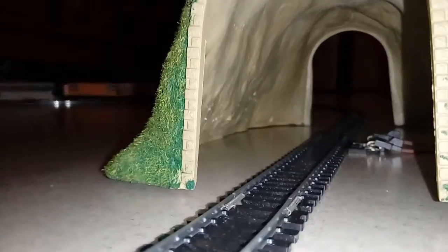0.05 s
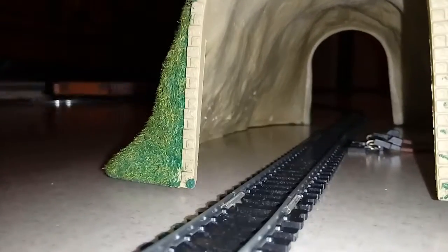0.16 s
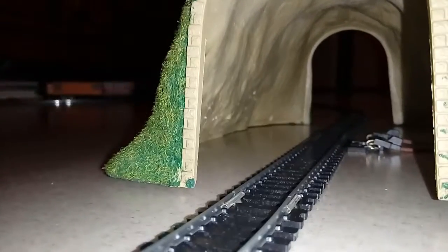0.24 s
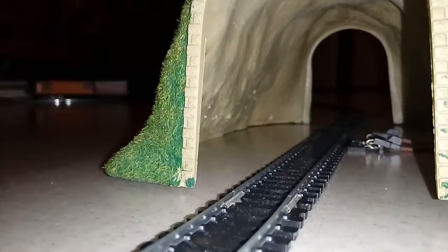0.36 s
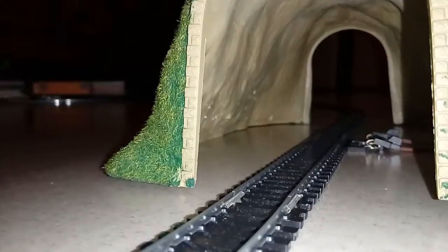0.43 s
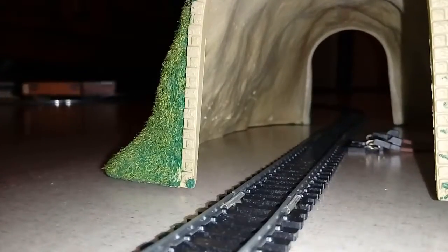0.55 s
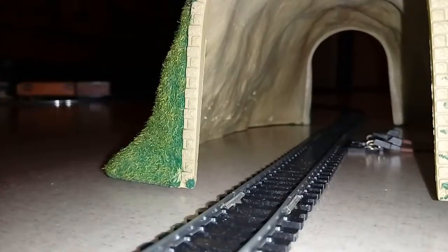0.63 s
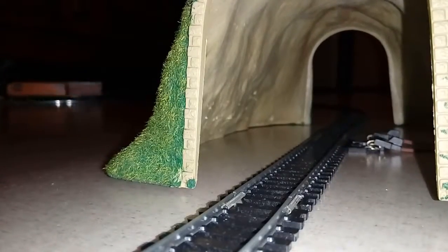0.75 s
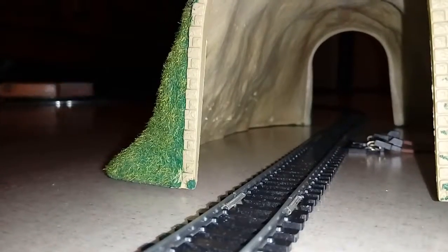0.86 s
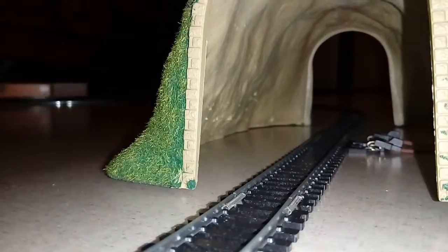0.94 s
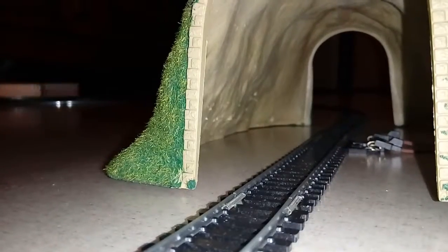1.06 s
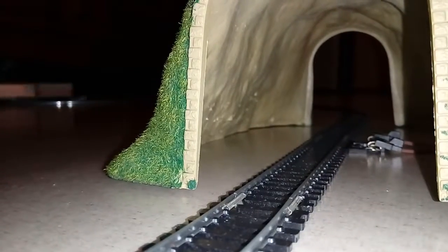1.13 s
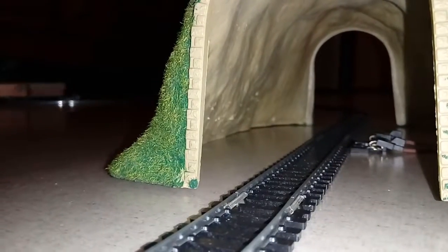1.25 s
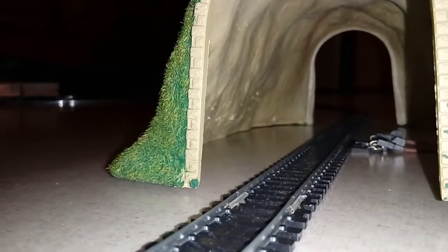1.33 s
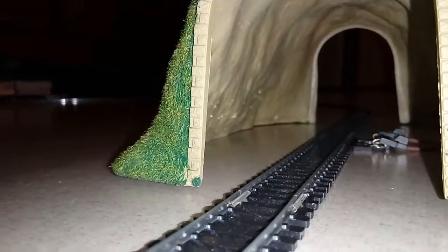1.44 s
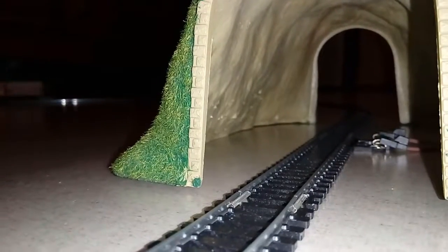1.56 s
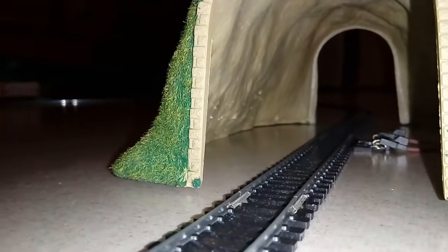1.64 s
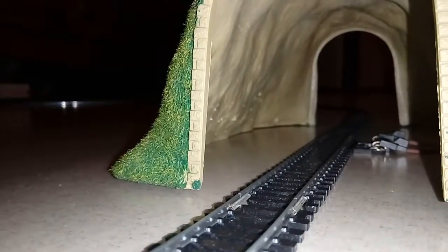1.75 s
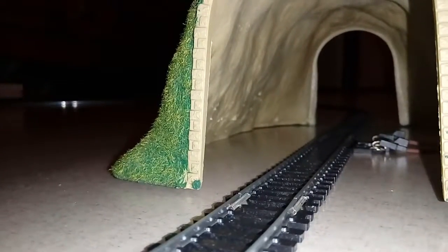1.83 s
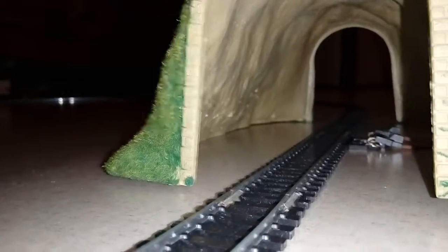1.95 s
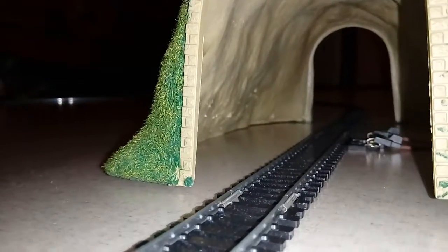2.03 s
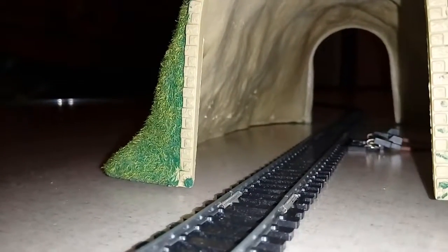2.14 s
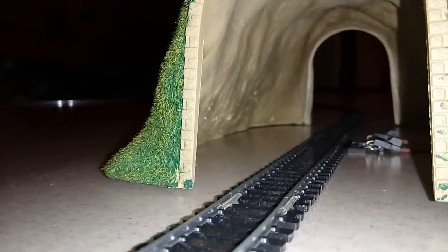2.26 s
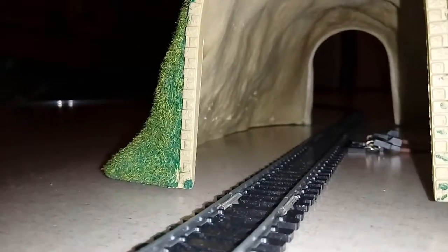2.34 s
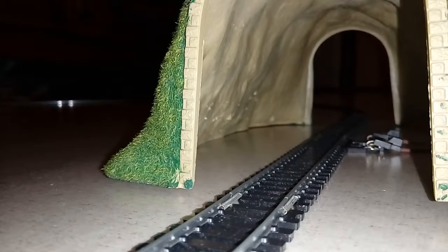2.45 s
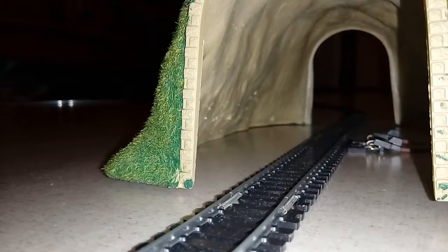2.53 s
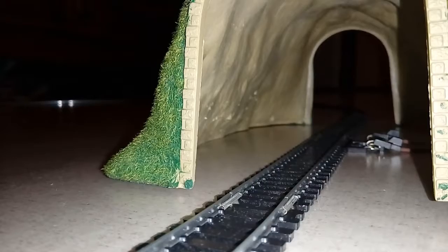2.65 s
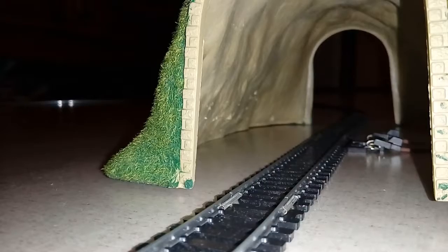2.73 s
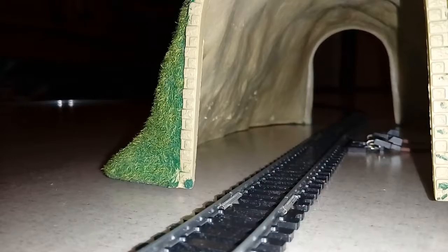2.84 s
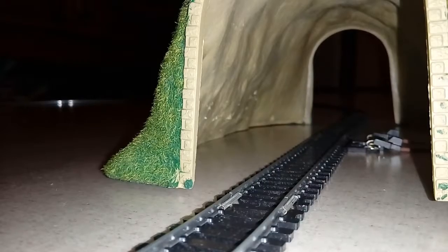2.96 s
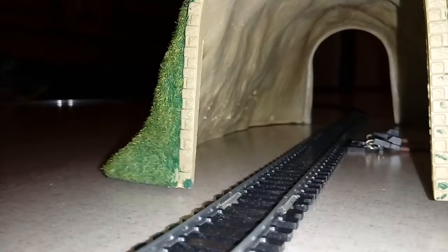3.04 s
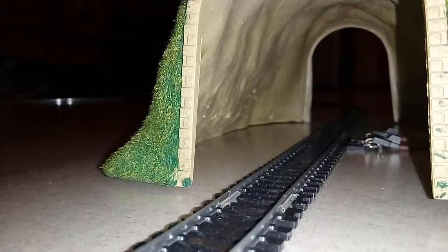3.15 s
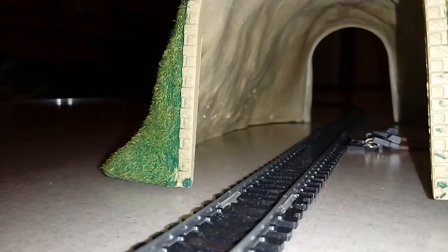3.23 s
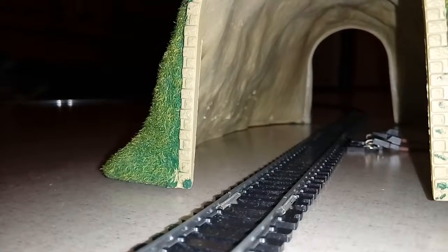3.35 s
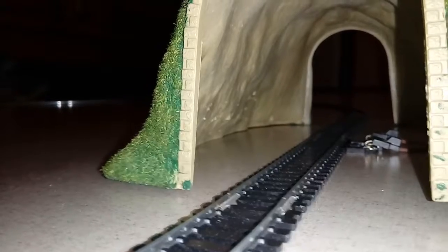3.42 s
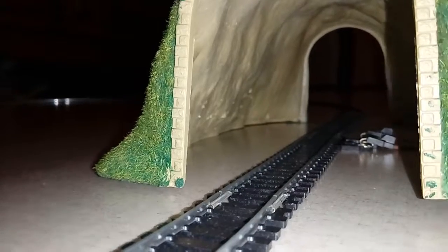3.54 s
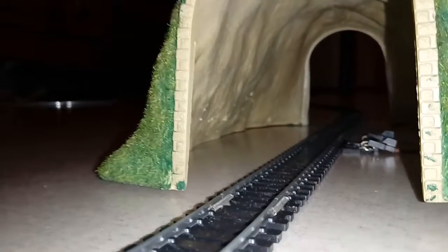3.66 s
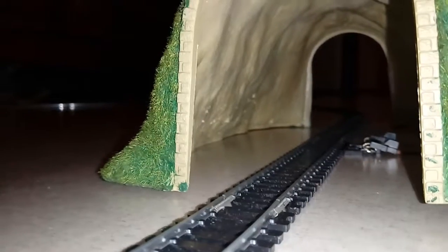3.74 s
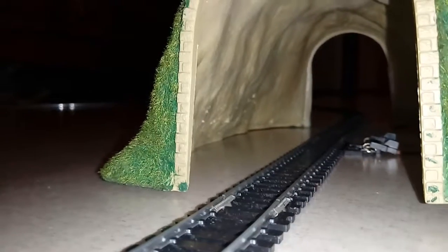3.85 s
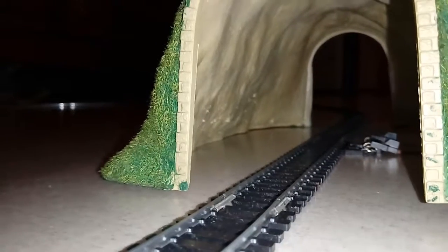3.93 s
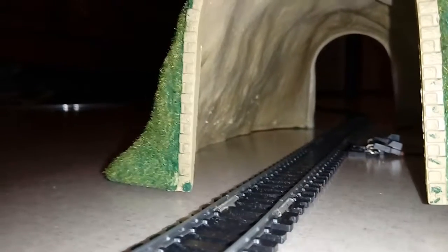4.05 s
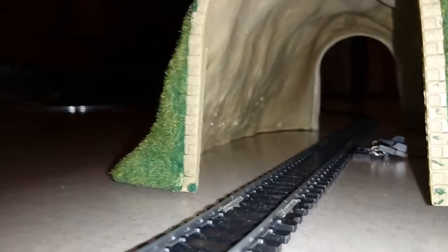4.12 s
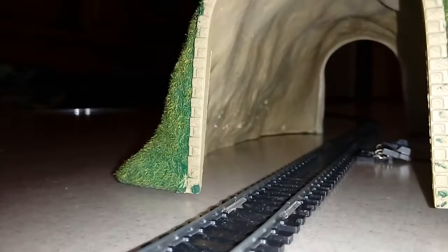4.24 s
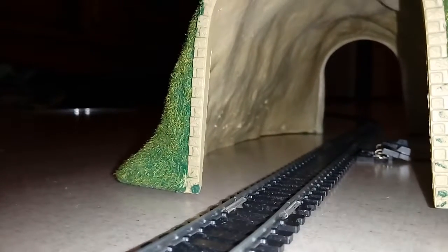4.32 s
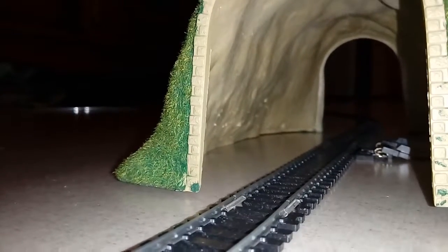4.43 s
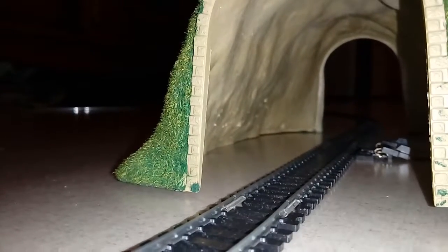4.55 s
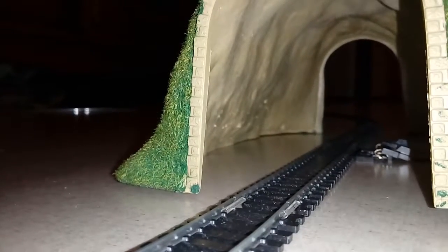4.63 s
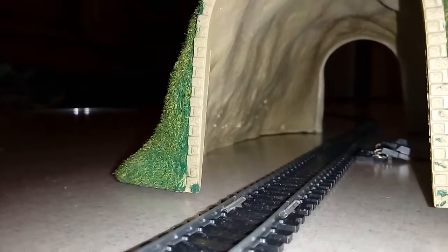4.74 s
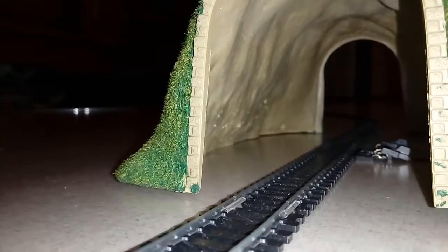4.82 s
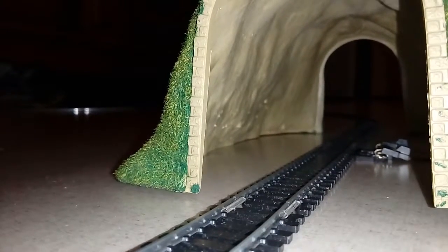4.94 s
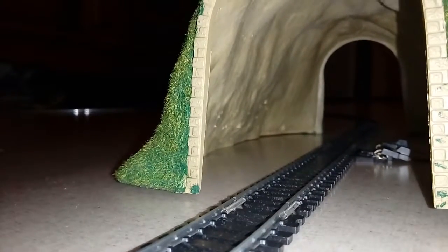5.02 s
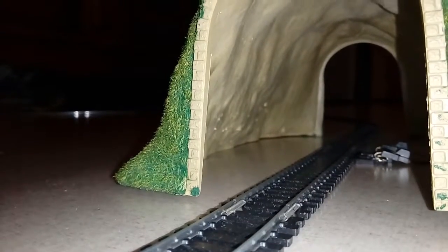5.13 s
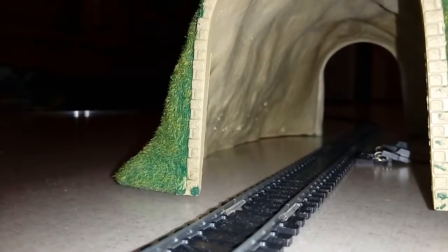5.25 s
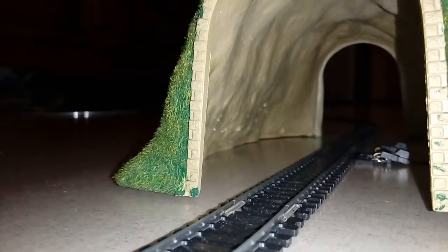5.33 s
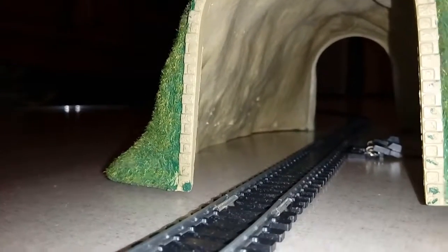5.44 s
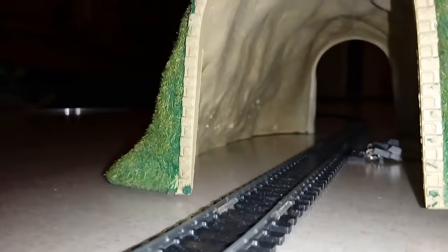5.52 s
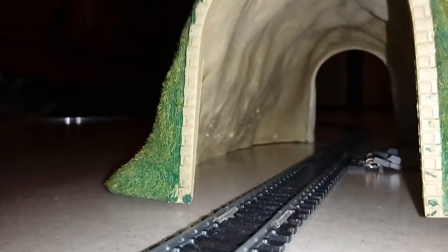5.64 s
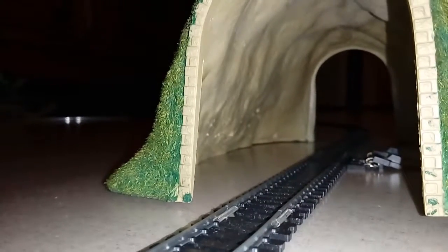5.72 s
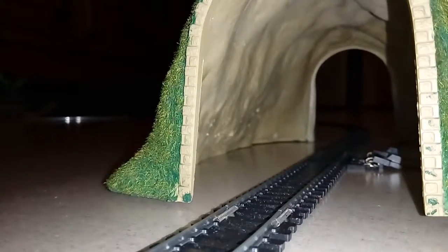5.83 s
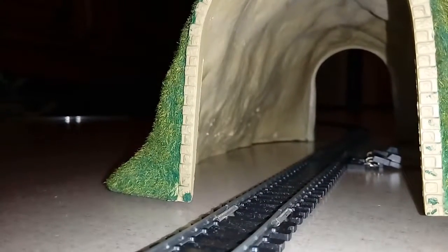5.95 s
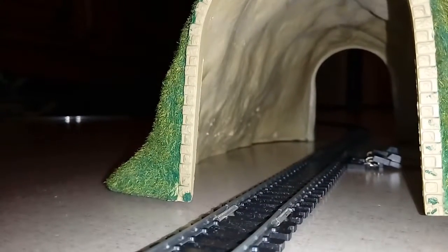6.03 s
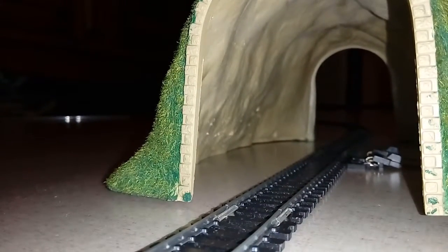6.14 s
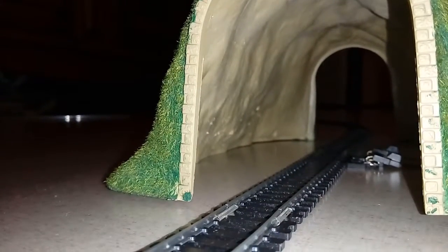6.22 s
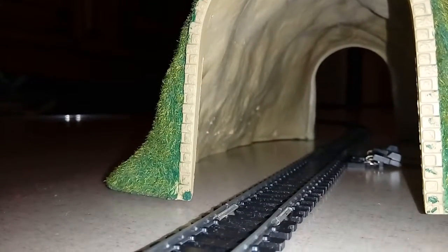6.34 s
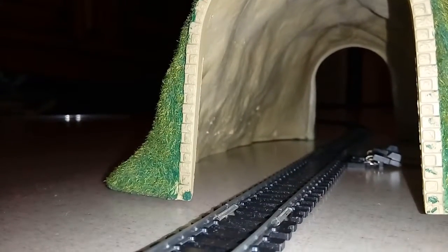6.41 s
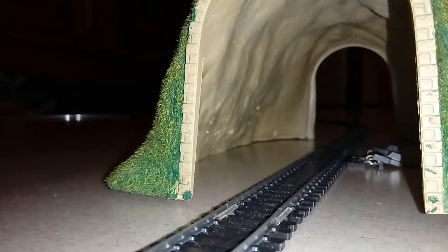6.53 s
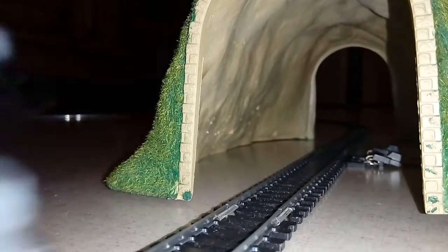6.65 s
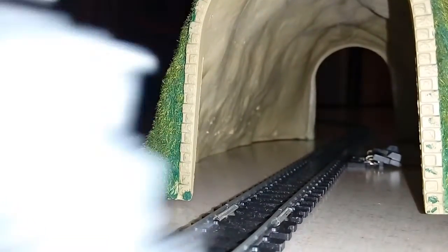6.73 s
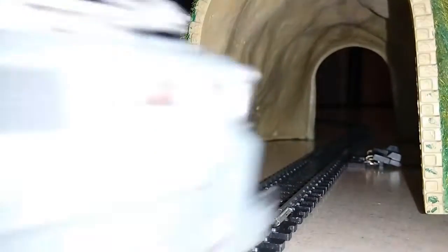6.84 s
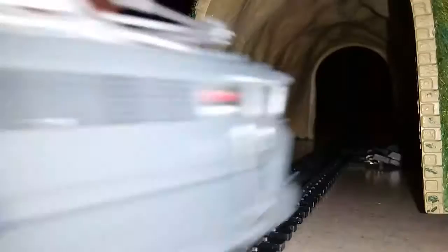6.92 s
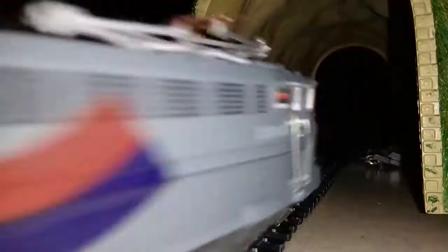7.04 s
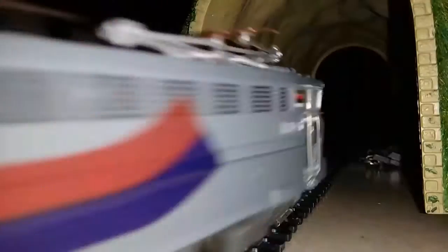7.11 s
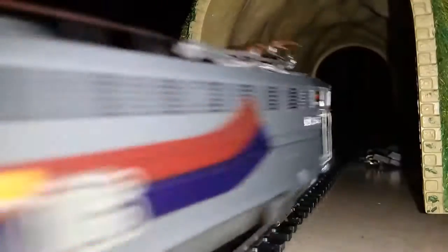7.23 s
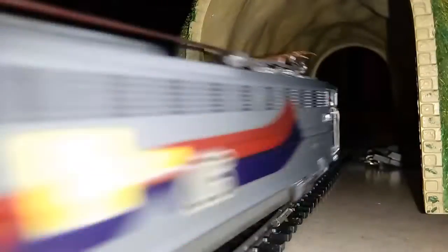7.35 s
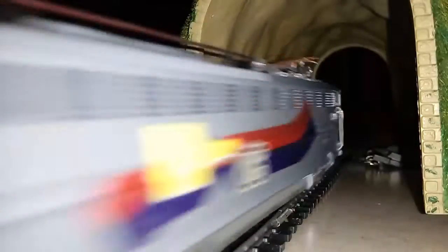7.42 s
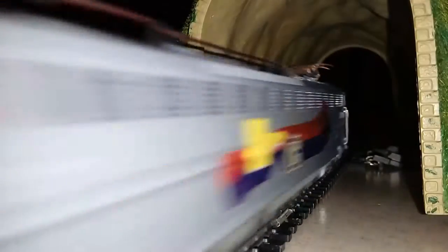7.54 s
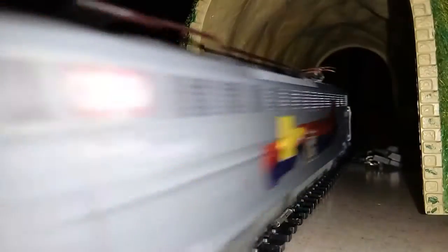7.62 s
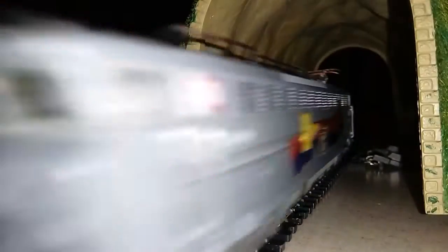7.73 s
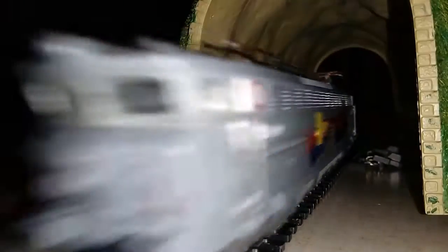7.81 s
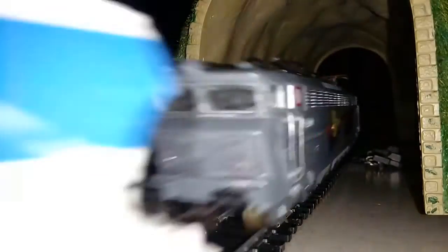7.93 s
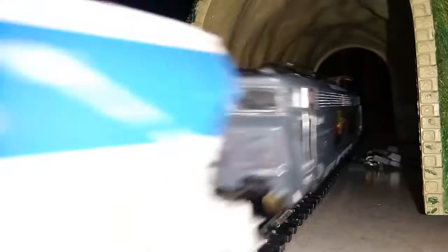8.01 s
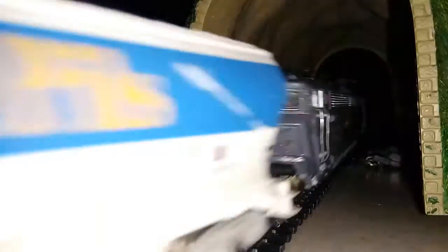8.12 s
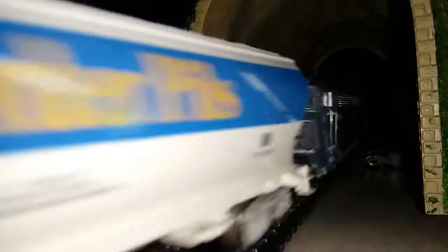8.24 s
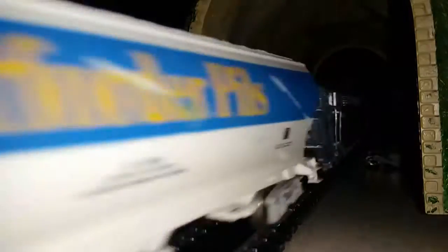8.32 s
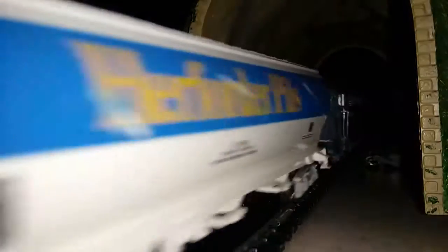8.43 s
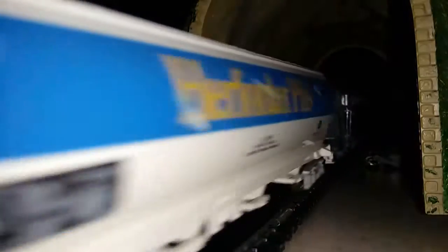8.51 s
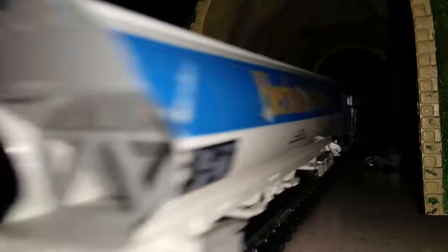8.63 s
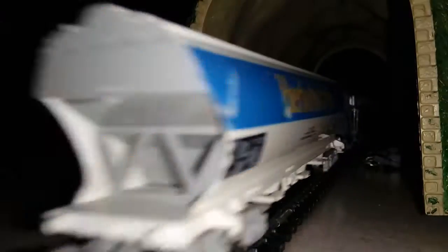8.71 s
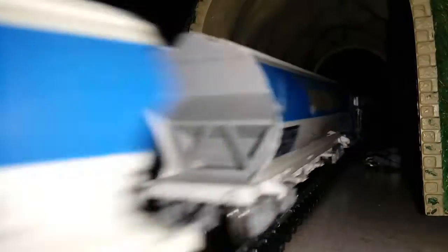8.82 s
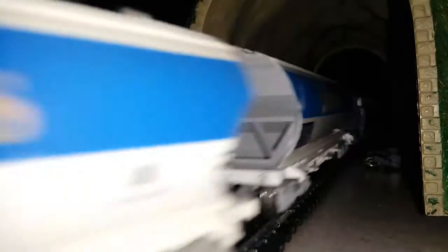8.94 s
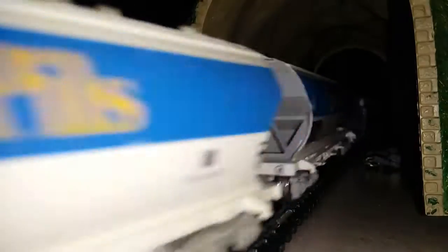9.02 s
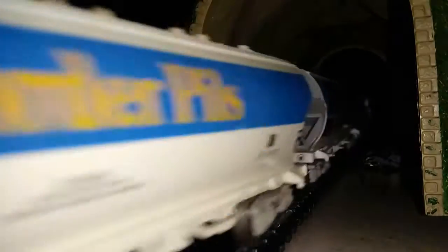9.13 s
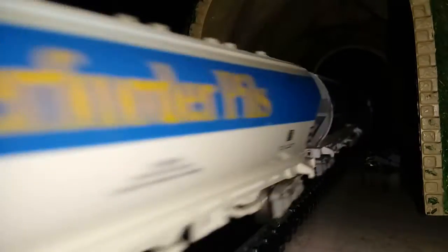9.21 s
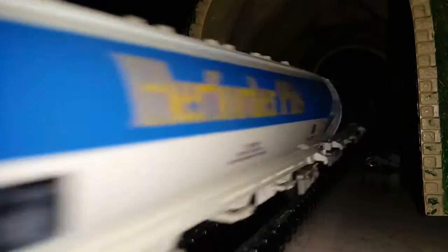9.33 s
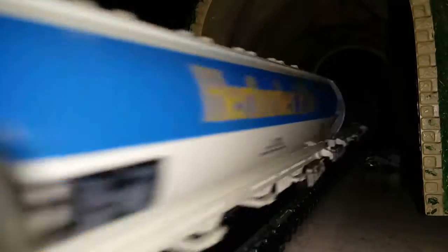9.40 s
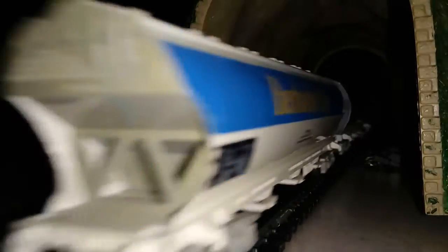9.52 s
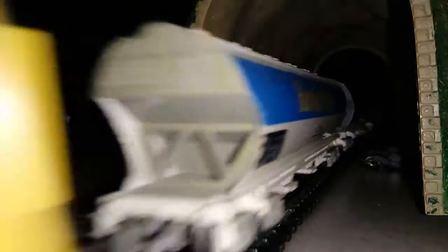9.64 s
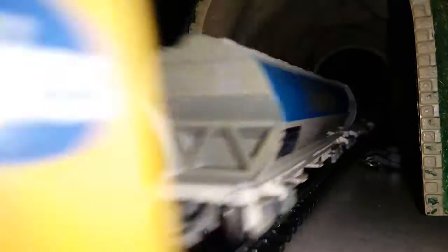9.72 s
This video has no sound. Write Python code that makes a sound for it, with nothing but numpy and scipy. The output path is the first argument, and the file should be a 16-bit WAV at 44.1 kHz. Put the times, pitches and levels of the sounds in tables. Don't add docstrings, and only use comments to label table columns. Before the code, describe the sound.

Steady gritty whirring of a toy locomotive, first distant and dull, then brighter and louder as it turns in and passes right beside the microphone. Soft finger taps and dry case clicks interrupt the approach. After the pass the motor fades under wagon rolling and bright ticks on rail joints. Quiet room with low rumble and faint hiss, boxy mono camera sound.

```python
import sys
import numpy as np
from scipy import signal
from scipy.fft import rfft, irfft, next_fast_len
from scipy.io import wavfile
from scipy.ndimage import uniform_filter1d, map_coordinates

SR = 44100
rng = np.random.default_rng(int(sys.argv[2]) if len(sys.argv) > 2 else 0)


def dump_mix(stems):
    frames = np.atleast_2d(stems).T
    limited = np.clip(frames, -1, 1)
    pcm = np.round(limited * 32767).astype(np.int16)
    wavfile.write(sys.argv[1], SR, pcm)


def voltage_ratio(decibels):
    exponent = np.asarray(decibels, float) / 20
    return 10 ** exponent


N = 430857

# t/s, shaft turns per s
SHAFT_SPEED = [(0, 40), (1, 42.5), (1.7, 43.7), (2, 45), (2.4, 44.3), (3, 46.3), (3.7, 47.5), (4.2, 46.3),
               (5, 47), (5.7, 48.6), (6.1, 50), (6.5, 47.7), (7.05, 49.2), (7.4, 48.1), (8, 46.8),
               (8.5, 45.5), (9.3, 47), (9.8, 47)]
# t/s, gear level/dB, motor in its shell level/dB
TRAIN_LEVELS = [(0, -37, -30), (.7, -40, -30), (1, -37, -32.5), (1.3, -37.5, -30), (2, -41, -30.5),
                (2.9, -38, -32), (3.9, -34.5, -32), (4.5, -37, -30), (5, -30.5, -32), (5.4, -29.5, -27.5),
                (5.85, -29.5, -33.5), (6.35, -24, -29.5), (7, -26.5, -21.5), (7.3, -27.5, -23.5),
                (7.9, -33, -30.5), (8.3, -32.5, -35.5), (8.9, -31.5, -33.5), (9.77, -36, -35)]
# lowest f/Hz, highest f/Hz
TRAIN_BANDS = [(1750, 3400), (1200, 1650), (3600, 7000), (7600, 13500)]
# f/Hz, level/dB
MICROPHONE = [(420, -20), (700, -18.5), (1000, -6), (1800, 0.5), (2600, -3.5), (3800, -12), (5200, -13.5),
              (6500, -24.5), (7200, -31.5), (7800, -38.5), (9600, -45.5), (10500, -45.5), (13800, -51.5)]
# f/Hz, width/Hz, level/dB
OUT_OF_SIGHT = [(1429, 197, 18), (2225, 480, 11), (2810, 220, 4), (3450, 440, 4), (4370, 280, 7),
                (5900, 190, 3), (6970, 560, 4), (8840, 460, 12)]
# f/Hz, width/Hz, level/dB
TURNING_IN = [(496.3, 86, 3.4), (1450, 230, 17), (2240, 730, 7.2), (3150, 210, 5), (4300, 220, 1),
              (6500, 500, 2), (8560, 1300, 13), (13660, 960, 7)]
# f/Hz, width/Hz, level/dB
TUNNEL_MOUTH = [(630, 230, -2), (1070, 230, 5.2), (1411, 41, 22), (2290, 730, 13), (3270, 1100, 15.5),
                (4200, 800, 10), (6730, 1600, 7.5), (8940, 1190, 9.5)]
# f/Hz, width/Hz, level/dB
WAGON_GAP = [(583, 370, 17.5), (1010, 490, 15.4), (1417, 120, 26.3), (1720, 290, 16), (2160, 310, 9.3),
             (3230, 390, 9.5), (3860, 1100, 8.2), (6800, 1600, 8.8)]
# f/Hz, width/Hz, level/dB
FAR_SIDE = [(610, 83, 4), (1423, 174, 21.5), (2197, 290, 8), (2830, 200, 8), (3660, 270, 0.5),
            (4360, 570, 9), (5870, 210, 1.5), (8900, 380, 10)]
# f/Hz, width/Hz, level/dB
LEFT_CURVE = [(520, 200, 3.2), (1354, 51, 24.5), (1503, 145, 18.9), (2225, 190, 17), (2930, 380, 10),
              (4500, 220, 0.47), (8900, 380, 1), (11590, 870, 6)]
# f/Hz, width/Hz, level/dB
BEHIND = [(625, 210, 6.5), (1455, 410, 15.2), (2300, 160, 3.4), (2840, 180, 5.1), (3130, 200, 5.3),
          (4320, 320, 6.7), (8400, 1300, 6.5), (10980, 600, 4)]
# f/Hz, width/Hz, level/dB
ALONGSIDE = [(579, 95, 11.8), (1080, 52, 7.4), (1396, 250, 16.7), (1720, 130, 4.9), (3200, 210, 8.6),
             (4420, 300, 2.6), (6260, 1450, 7.3), (8830, 730, 8), (11380, 1460, 6)]
# f/Hz, width/Hz, level/dB
WAGONS = [(563, 150, 15), (910, 700, 12.1), (1434, 280, 21), (2180, 630, 12), (3200, 300, 11),
          (3920, 1100, 4.7), (6740, 2100, 6.6), (9050, 1830, 2)]
PLACE_TIMES = [.5, 1.5, 2.6, 4.5, 5.1, 6, 6.8, 7.3, 7.9, 8.6, 8.95, 9.3]
# t/s, share of rattle 0-1
NEARNESS = [(0, 0.36), (4.6, 0.36), (5.1, 0.35), (6, 0.47), (7, 0.49), (7.8, 0.38), (9.8, 0.33)]
# multiple of shaft rate, level/dB
STROKES = [(1, 6.5), (2, 7), (3, 8), (5, 9)]
# t/s, share 0-1
IN_VIEW = [(0, 0), (4.75, 0.12), (5.05, 0.87), (5.65, 0.78), (6.05, 1), (7, 0.57), (7.7, 0.9), (9.8, 0)]
# far level/dB, dB per dB of gear level, gain in full view/dB
WHEEL_HISS = (-46.5, 0.35, 6.8)
# lowest level/dB, dB per dB of gear level, gain in full view/dB
SIZZLE = (-75.5, .05, 10.5)
# multiple of shaft rate, t/s, half length/s
HUM_BEAMS = [(5, 6.95, .5), (6, 3, .8), (6, 6.85, .45), (6, 7.65, .4), (9, 7, .5), (12, 4.2, .8),
             (12, 6.8, .55), (12, 8.85, .35), (13, 3.9, .7), (13, 6.9, .45), (15, .4, .7), (15, 5.9, .25),
             (15, 7.5, .6)]
HUM_LEVELS = [-57, -67, -55, -55.5, -63.5, -62, -49, -57, -64, -51, -67.5, -56.5, -61]
# f/Hz, level/dB per Hz
RUMBLE = [(12, -60), (20, -30.5), (76, -1), (245, -5.5), (278, -3.5), (386, -9.5), (551, -19), (600, -3),
          (780, -50), (1320, -120)]
# f/Hz, level/dB per Hz
HISS = [(6000, -39), (9000, -18), (12800, -13), (13800, -8), (14600, -3), (15300, 1), (16000, -5)]
# t/s, half length/s, rise/dB
SCRAPES = [
    (5.2, .25, 5),
    (6.948, .65, 6),
]
# t/s, length/s, level/dB
SLIDES = [(0.072, .005, -41.5), (0.363, .005, -47), (.745, .06, -44), (0.979, .005, -46),
          (1.252, .005, -40), (1.297, .045, -37.5), (1.486, .05, -41), (1.595, .065, -46),
          (1.857, .04, -44), (2.044, .02, -47), (2.131, .005, -42), (2.229, .135, -47.5),
          (3.005, .015, -46), (3.098, .055, -43.5), (3.475, .04, -40), (3.56, .005, -47),
          (3.951, .005, -47), (4.085, .09, -46.5), (4.218, .06, -43), (4.432, .06, -45.5),
          (4.66, .055, -48.5), (5.258, .04, -39.5), (5.411, .005, -36), (5.463, .04, -49),
          (5.558, .005, -46), (6.2, .055, -47)]
# f/Hz, level/dB per Hz
RUB = [(30, -14.5), (90, -1.5), (200, -0.5), (400, -10), (900, -25.5), (2000, -60)]
# t/s, peak level/dB, f/Hz
THUDS = [(0.787, -40.5, 250), (1.064, -35.5, 260), (1.194, -37, 230), (1.216, -35, 230), (1.287, -32, 257),
         (1.347, -38, 232), (1.418, -34.5, 298), (1.427, -33, 316), (1.674, -37.5, 230),
         (1.722, -39.5, 282), (1.948, -40.5, 230), (3.125, -34.5, 158), (3.146, -38.5, 199),
         (3.455, -34, 228), (3.77, -39.5, 240), (3.798, -36.5, 189), (4.196, -39, 200), (4.96, -35.5, 227),
         (5.02, -22, 338), (5.027, -31, 140), (5.249, -40, 313), (5.323, -36.5, 350), (5.356, -34, 270),
         (5.366, -31, 302), (5.383, -35, 210), (5.404, -35, 240), (5.442, -37, 178), (5.613, -38.5, 230),
         (5.639, -37.5, 167), (6.312, -37.5, 230)]
# f/Hz, level/dB
SOFT_BODY = [(20, -3.5), (70, -1), (900, 2.5), (2500, -18), (7000, -49)]
# t/s, peak level/dB, edge sharpness
SNAPS = [(1.1832, -24, .3), (1.2979, -22, .3), (1.3724, -36, 0), (1.4247, -21, .4), (1.6894, -36, 1),
         (3.4531, -23, 2), (3.4845, -33, .5), (5.0794, -33, 4), (5.2465, -31, 6), (5.8481, -23, 0)]
# f/Hz, level/dB
CASE = [(1500, -25.5), (3000, 3), (4400, 4), (6000, -6), (8000, -32), (12000, -48), (15500, -51)]
# t/s, peak level/dB, ring f/Hz
JOINTS = [(7.2176, -21, 3910), (7.3555, -24, 4300), (7.4165, -21, 4600), (7.4474, -25, 4730),
          (7.5747, -16.5, 4340), (7.6294, -31, 4230), (7.6505, -23.5, 4750), (7.7463, -23.5, 4700),
          (9.435, -37, 4660), (9.4862, -25, 5200), (9.4985, -29, 5050), (9.5217, -27, 5370),
          (9.534, -27, 5380), (9.623, -31, 5300), (9.632, -36, 5490), (9.716, -34.5, 4700)]
# f/Hz, level/dB
WHEEL = [(500, -19), (1200, -9), (2500, 8), (4500, 0), (6500, -9), (7800, -30), (15000, -63.5)]


def unit(x):
    return x / np.sqrt(np.mean(x ** 2) + 1e-20)


def noise():
    return rng.standard_normal(N)


def along(points, hz):
    f, v = np.transpose(points)
    return np.interp(np.log(hz + 1), np.log(f + 1), v)


def curves(rows, t=None):
    s, *columns = np.transpose(rows)
    if t is None:
        t = np.arange(N) / SR
    return [np.interp(t, s, column) for column in columns]


def wobble(rate):
    knots = rng.standard_normal(int(N * rate / SR) + 4)
    return map_coordinates(knots, [np.arange(N) * rate / SR])


def swell(s, half):
    return np.exp(-((np.arange(N) / SR - s) / half) ** 2)


def coloured(x, spectrum):
    m = next_fast_len(N + 8192)
    gain = voltage_ratio(along(spectrum, np.fft.rfftfreq(m, 1 / SR)))
    return irfft(rfft(x, m) * gain, m)[:N]


def strikes(rows, shape):
    out, t = np.zeros(N + SR), np.arange(SR // 10) / SR
    for s, db, *rest in rows:
        out[round(s * SR):][:len(t)] += voltage_ratio(db) * shape(t, *rest)
    return out[:N]


def resonances(modes, hz):
    peaks = sum(voltage_ratio(2 * db) / (1 + (2 * (hz - c) / w) ** 2) ** 2.55 for c, w, db in modes)
    return 10 * np.log10(1 + peaks)


def shaft():
    speed = curves(SHAFT_SPEED)[0] * (1 + .006 * wobble(12))
    return 2 * np.pi * np.cumsum(speed) / SR


def gears(turn, beat_db, grit_share):
    near = curves(NEARNESS)[0]
    beat = near * unit(sum(voltage_ratio(db) * np.cos(k * turn) for k, db in STROKES))
    slack = 0.8 * wobble(30) + .5 * wobble(8)
    spot = (turn / (2 * np.pi) % 1 * 900).astype(int)
    flaws = rng.standard_normal(900)[spot]
    teeth = noise() + (.12 + .5 * near) * flaws
    hits = rng.random(N) < 600 / SR
    grit = unit(hits * noise()) * near
    rows = []
    for db, share in zip(beat_db, grit_share):
        rattle = unit(teeth * voltage_ratio(db * (beat + 0.15 * slack)))
        rows.append(unit(rattle + share * grit))
    return np.array(rows)


def train(turn):
    noises = gears(turn, beat_db=[3.4, 7.5], grit_share=[.1, .6])
    hz, t, (smooth, rough) = signal.stft(noises, SR, nperseg=1024, noverlap=768)
    share = np.clip(along([(2000, 0), (9000, 0.64)], hz), 0, 1)[:, None]
    z = (1 - share) * smooth + share * rough

    route = (FAR_SIDE, LEFT_CURVE, OUT_OF_SIGHT, OUT_OF_SIGHT, TURNING_IN, BEHIND,
             ALONGSIDE, ALONGSIDE, TUNNEL_MOUTH, WAGONS, WAGON_GAP, WAGONS)
    places = np.array([resonances(place, hz) for place in route])
    colour = np.array([np.interp(t, PLACE_TIMES, row) for row in places.T])
    colour += along([(250, -35.5)] + MICROPHONE + [(15000, -67)], hz)[:, None]
    field = uniform_filter1d(rng.standard_normal(z.shape), size=3, axis=0)
    colour += 2.16 * unit(uniform_filter1d(field, size=50, axis=1))

    level, motor = curves(TRAIN_LEVELS, t)
    view = curves(IN_VIEW, t)[0]
    wanted = [level, motor]
    for far, grows, seen in (WHEEL_HISS, SIZZLE):
        wanted.append(far + grows * (level + 39) + seen * view)
    centres = [np.sqrt(low * high) for low, high in TRAIN_BANDS]
    trim = 0
    for (low, high), one, want in zip(TRAIN_BANDS, np.eye(len(centres)), wanted):
        inside = (hz > low) & (hz < high)
        have = 10 * np.log10(np.sum(voltage_ratio(2 * colour[inside]), 0) / len(hz))
        weight = along(sorted(zip(centres, one)), hz)[:, None]
        trim = trim + weight * (want - have)
    return signal.istft(z * voltage_ratio(colour + trim), SR, nperseg=1024, noverlap=768)[1][:N]


def hum(turn):
    out = np.zeros(N)
    for order in sorted({row[0] for row in HUM_BEAMS}):
        beam = np.zeros(N)
        for (k, s, half), db in zip(HUM_BEAMS, HUM_LEVELS):
            if k == order:
                beam += voltage_ratio(db) * swell(s, half)
        angle = order * turn
        line = (0.85 + 0.3 * wobble(22)) * np.sin(angle) + 0.4 * wobble(22) * np.cos(angle)
        out += voltage_ratio(2.0) * beam * line
    return out


def background():
    rumble = voltage_ratio(-59.5 + 0.38 * wobble(3)) * unit(coloured(noise(), RUMBLE))
    scrape_db = 0
    for s, half, db in SCRAPES:
        scrape_db = scrape_db + db * swell(s, half)
    scrape_db = scrape_db * (1 + .4 * wobble(250))
    hiss = voltage_ratio(-72 + scrape_db + .9 * wobble(15)) * unit(coloured(noise(), HISS))
    return rumble + hiss


def rubbing():
    fade_s, under_db = .008, -10
    press = sum(voltage_ratio(db + under_db) * swell(s + length / 2, length / 2 + fade_s)
                for s, length, db in SLIDES)
    return press * unit(coloured(noise(), RUB))


def slips():
    gap_s, pitch_hz, pitch_spread, scatter_db = .016, 230, .2, 0.5
    rows = []
    for s, length, db in SLIDES:
        wait = rng.random(9)
        after = gap_s * (np.cumsum(.5 + wait) - .5 - wait[0])
        for a in after[after < length]:
            size, pitch = rng.standard_normal(2)
            rows.append((s + a, db + scatter_db * size * (a > 0), pitch_hz * np.exp(pitch_spread * pitch)))
    return rows


def thud(t, hz):
    phase = 2 * np.pi * hz * (0.73 * t + 0.0012 * (1 - np.exp(-t / 0.00098)))
    return 1.64 * np.sin(phase) * np.exp(-t * hz / 0.65)


def snap(t, edge):
    click = (1 + edge) * (t == 0) - edge * (t == t[1])
    return click + 0.053 * rng.standard_normal(len(t)) * np.exp(-t / .0006)


def handling():
    pushes = [(s - .0025, db, hz) for s, db, hz in THUDS + slips()]
    snaps = [(s + 0.0015, db, edge) for s, db, edge in SNAPS]
    body = coloured(strikes(pushes, thud), SOFT_BODY)
    return body + rubbing() + voltage_ratio(17) * coloured(strikes(snaps, snap), CASE)


def joint(t, hz):
    scrape = uniform_filter1d(rng.standard_normal((2, len(t))), size=20)
    ring = np.sin(2 * np.pi * hz * t)
    tone = scrape[0] * ring + 0.52 * scrape[1] * np.sin(2 * np.pi * 0.98 * hz * t)
    knock = .6 * rng.standard_normal(len(t))
    return (2.0 * tone + 0.55 * ring + knock) * np.exp(-t / 0.0064) * (1 - np.exp(-t / 0.0018))


def joints():
    return voltage_ratio(2.5) * coloured(strikes(JOINTS, joint), WHEEL)


def scene():
    turn = shaft()
    return (train(turn) + hum(turn) + background() + handling() + joints())[None]


def top_cut(x):
    return signal.sosfilt(signal.butter(12, 15530, fs=SR, output="sos"), x)


def record(dry):
    held = dry / (1 + np.abs(dry / .45) ** 4) ** (1 / 4)
    return top_cut(held)


dry = scene()
out = record(dry)
dump_mix(out)
```